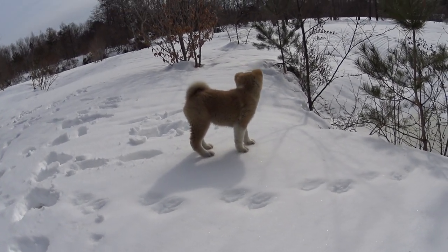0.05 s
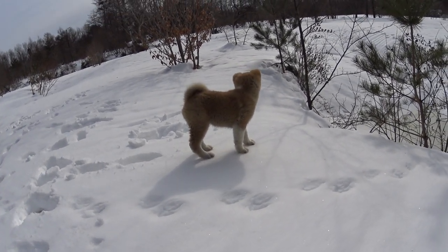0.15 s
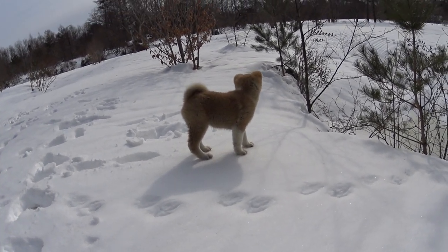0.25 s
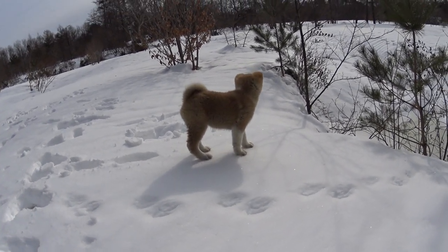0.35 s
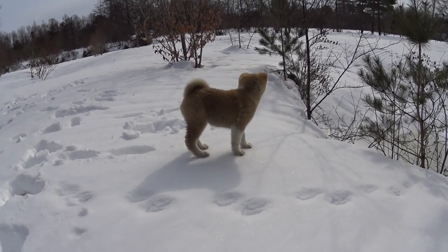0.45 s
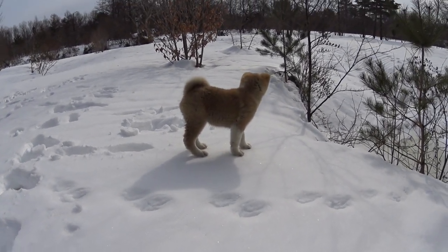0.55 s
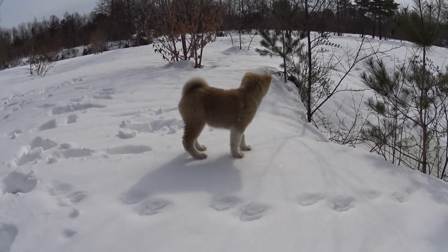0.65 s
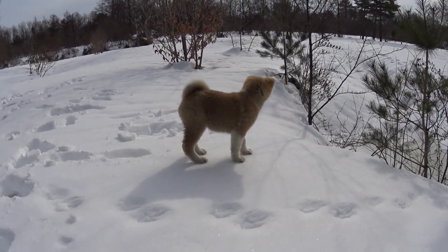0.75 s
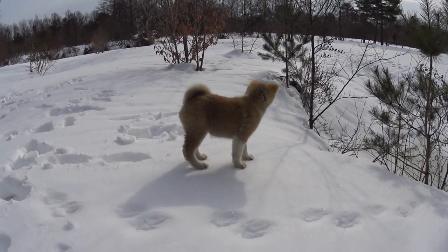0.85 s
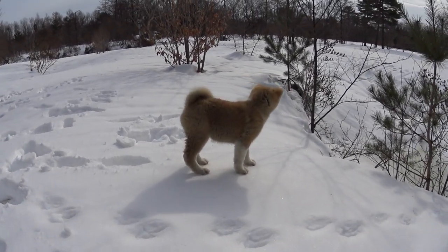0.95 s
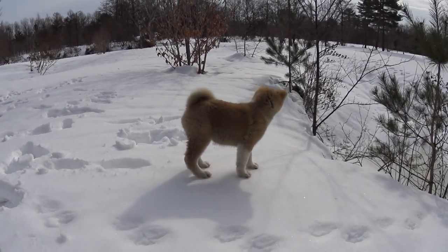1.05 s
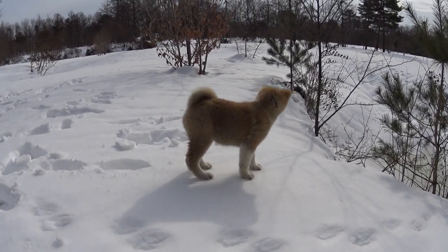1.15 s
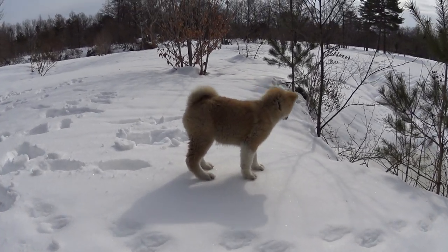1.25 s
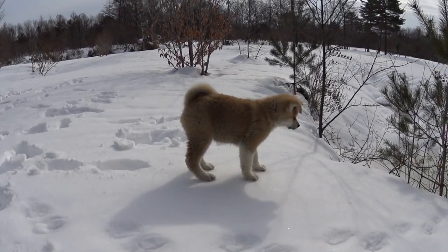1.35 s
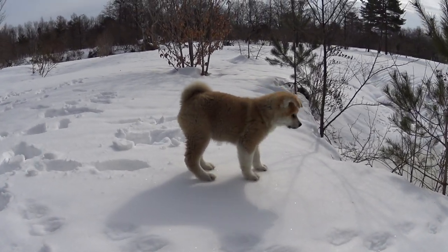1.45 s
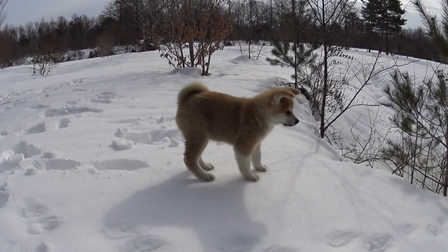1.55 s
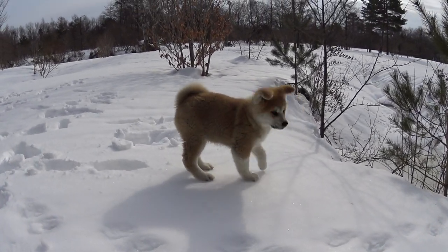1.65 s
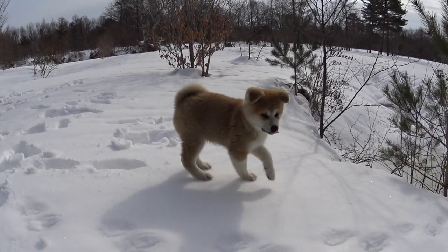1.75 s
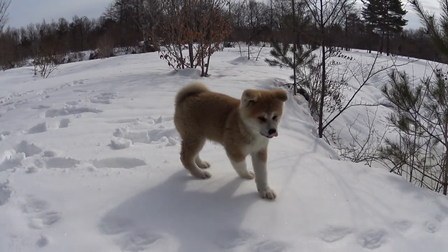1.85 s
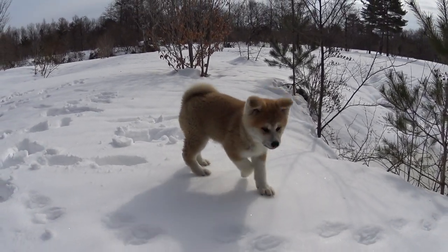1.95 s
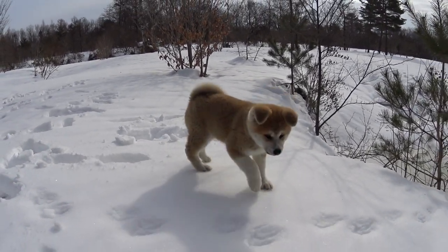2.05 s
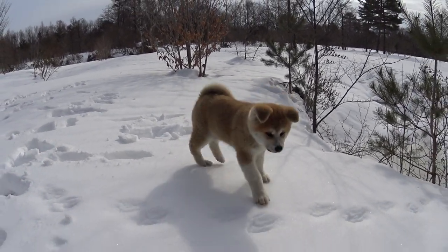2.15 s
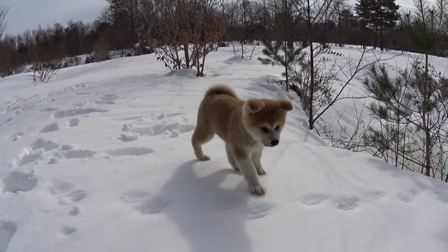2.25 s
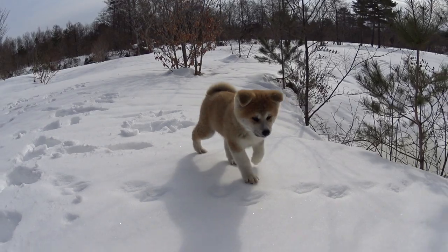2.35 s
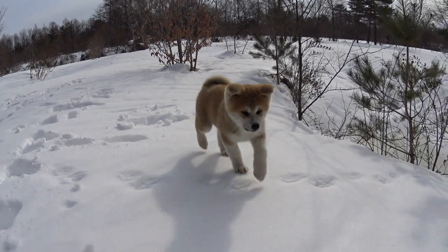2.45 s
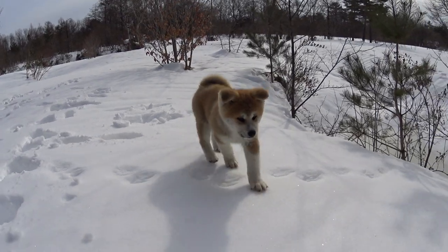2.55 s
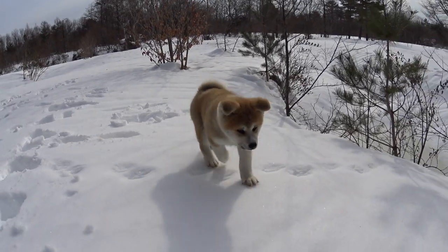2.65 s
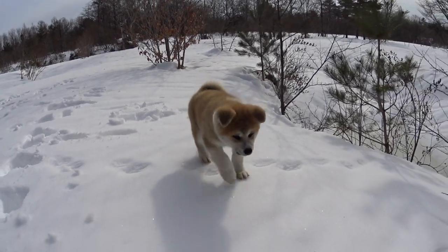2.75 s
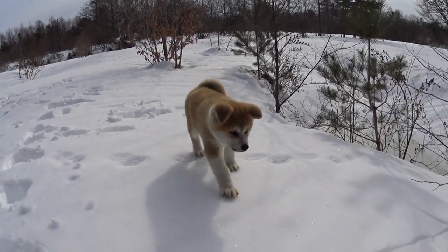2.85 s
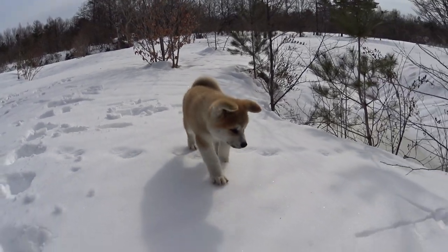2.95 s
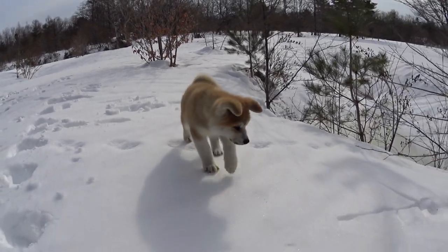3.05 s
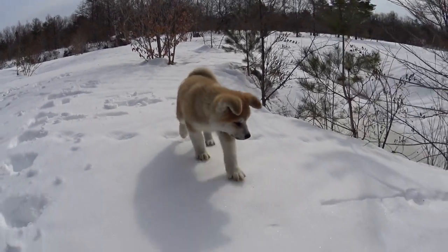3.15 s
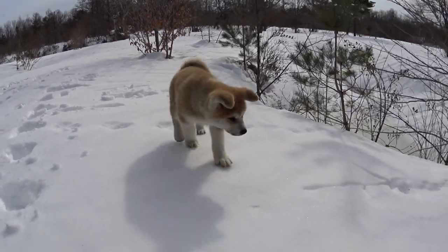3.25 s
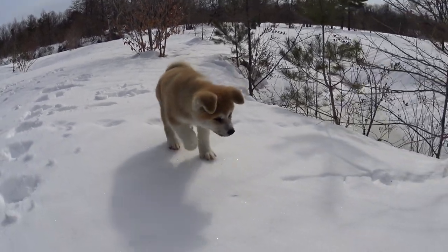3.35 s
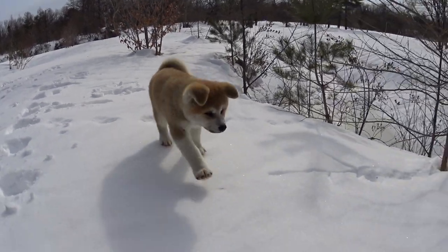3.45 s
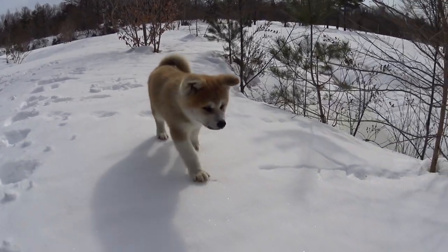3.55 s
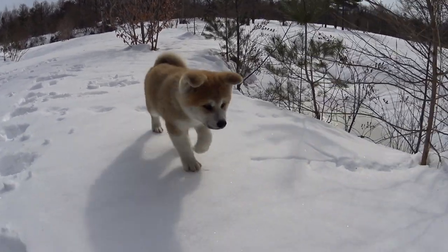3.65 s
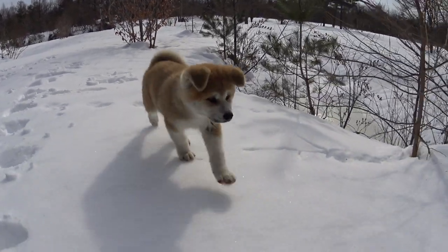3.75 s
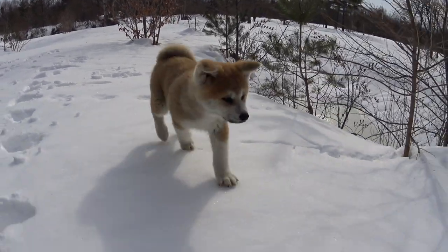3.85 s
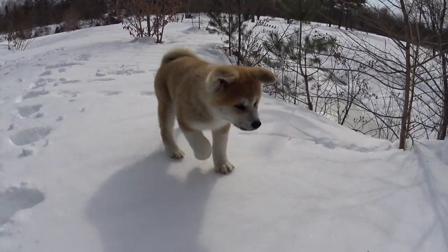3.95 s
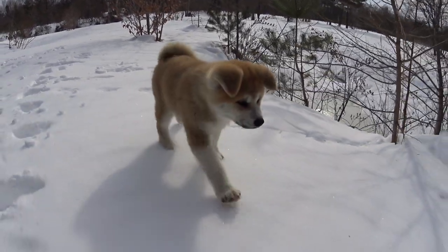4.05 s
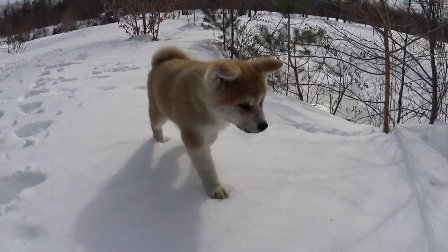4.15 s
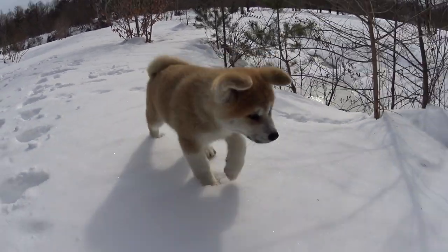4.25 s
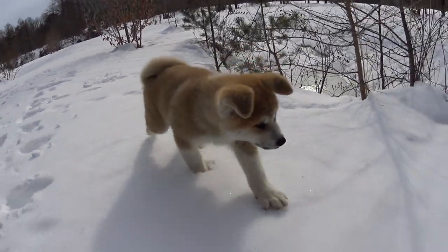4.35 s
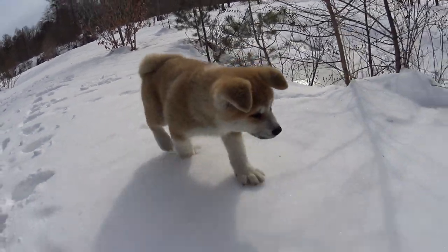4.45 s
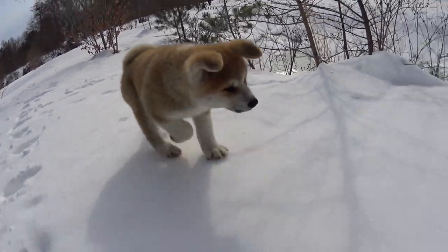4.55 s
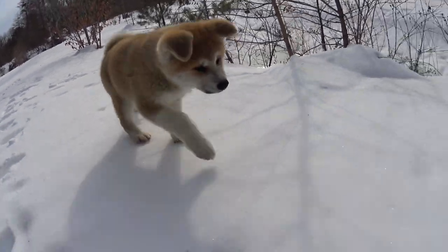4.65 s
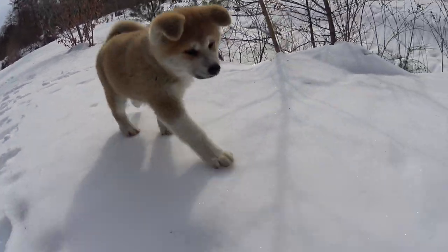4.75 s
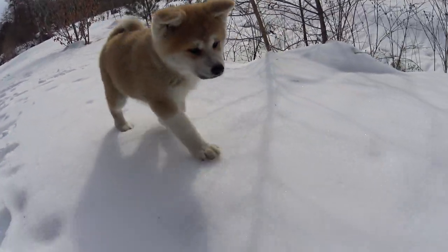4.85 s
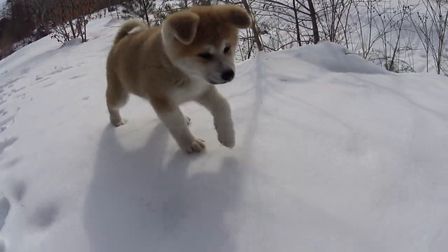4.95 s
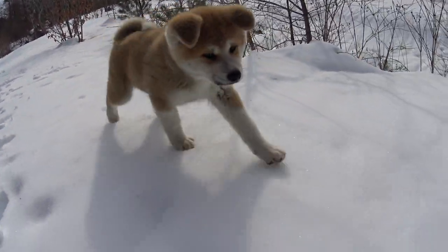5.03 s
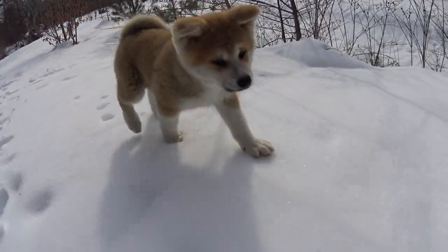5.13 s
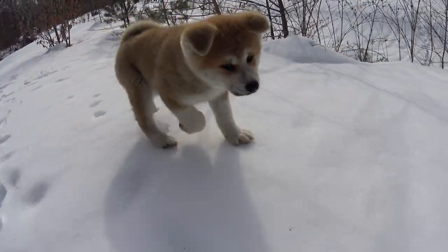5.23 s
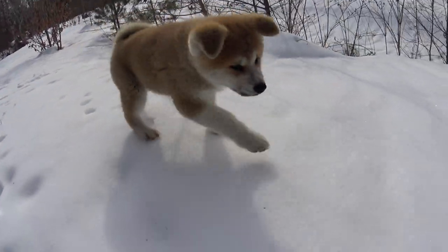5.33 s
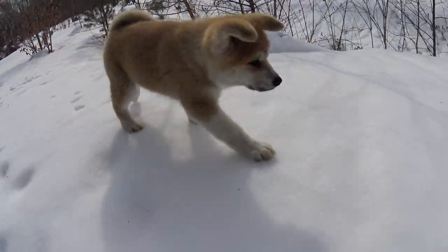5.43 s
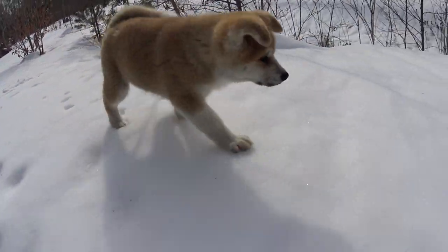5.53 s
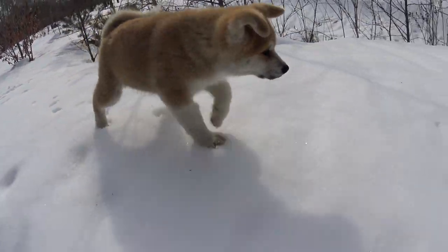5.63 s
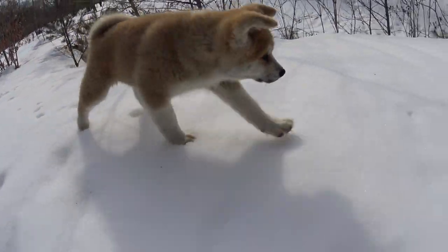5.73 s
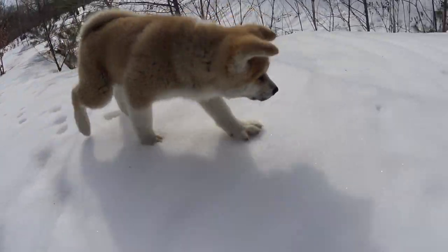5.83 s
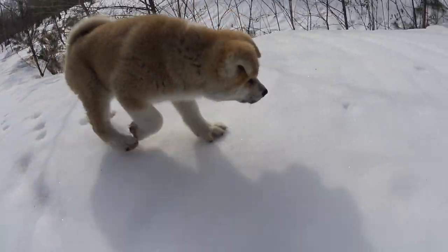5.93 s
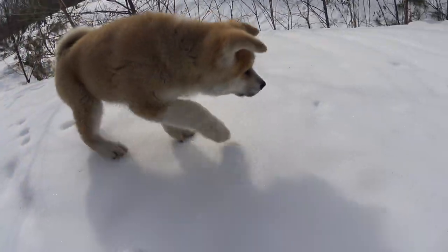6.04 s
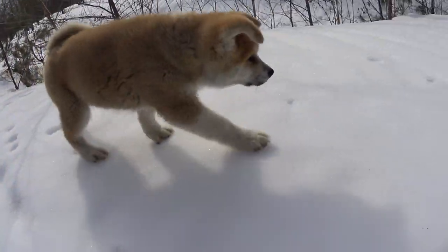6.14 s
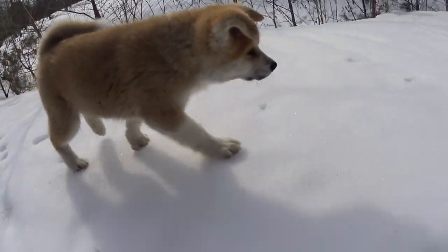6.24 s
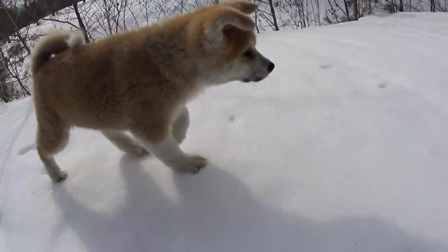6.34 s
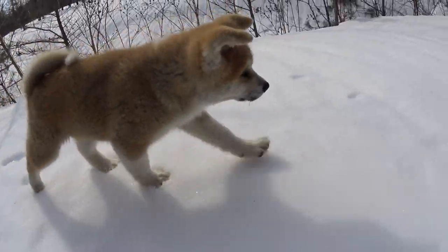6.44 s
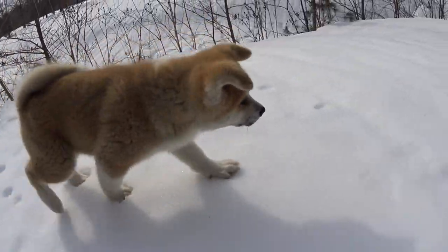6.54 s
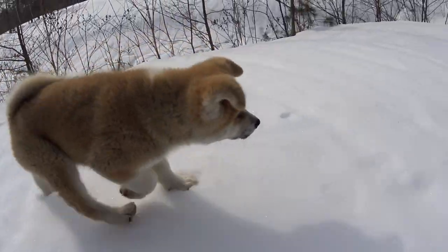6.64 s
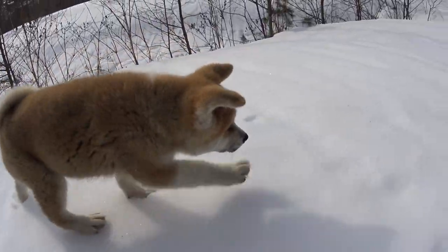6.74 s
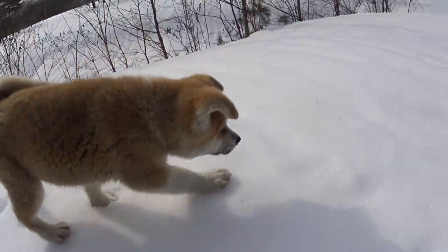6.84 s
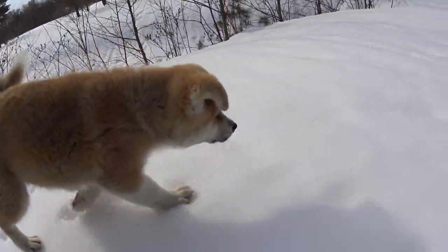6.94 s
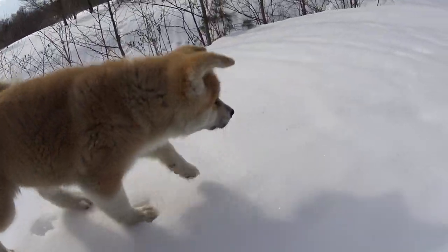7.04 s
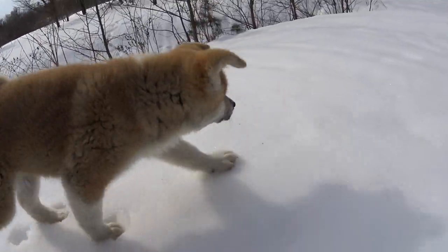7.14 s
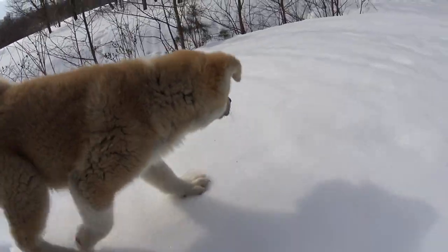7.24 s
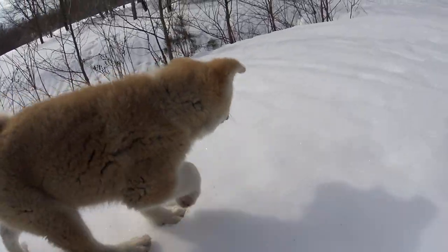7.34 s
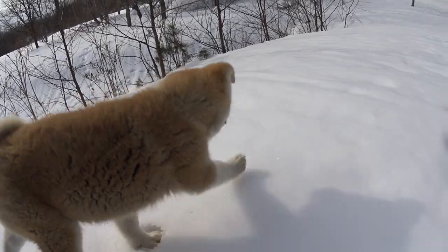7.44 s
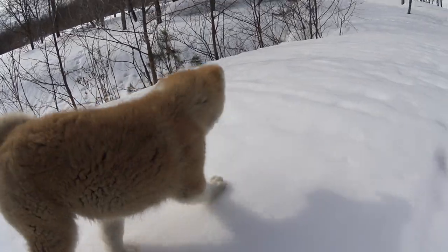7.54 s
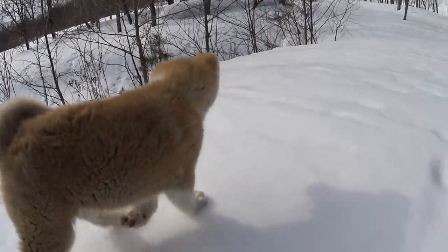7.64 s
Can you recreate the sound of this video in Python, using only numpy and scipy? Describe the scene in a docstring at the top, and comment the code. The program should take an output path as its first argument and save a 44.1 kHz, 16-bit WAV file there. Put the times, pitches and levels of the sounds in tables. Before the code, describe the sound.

In quiet open air with a very faint, wide hush, a rapid cluster of light hollow knocks and ticks comes from the camera's case between 0.05 and 0.4 seconds. A soft rustle swells around 0.8 and fades by 1.5. From about 1.6 a puppy's paws start treading on crusted snow, the first steps faint, then firmer crunches near 1.9, 2.7 and 2.9. Steps continue irregularly, roughly two to four per second, each a gritty, jerky packing with a dull groan, short low thumps of falling pitch and icy crackles. Fuller crunches come around 3.6-3.9 and 4.6; from 5 to 5.8 the steps are lighter, with crisp high crystal snaps. Brighter hiss builds at 6.0-6.6, then the heaviest, closest crunch lands near 6.85, followed by dense crackling to 7.3 and a small final crunch about 7.6. The sound is dry, close, without echo.

```python
"""Footsteps on crusted snow

Feet tread through crusted snow just below a hand-held camera, in the open under a faint hush of air.
Each tread packs the snow: stick-slip jerks gate random grains into a crunch, a groan and a hiss.
Pockets cave in as short pushes of falling pitch, and the icy crust breaks in coloured bursts of grains.
Before the walk a soft rustle passes, and light knocks ring the decaying modes of the camera's case."""
import sys
import numpy as np
from scipy import signal
from scipy.fft import rfft, irfft
from scipy.io import wavfile

SR = 44100
rng = np.random.default_rng(int(sys.argv[2]) if len(sys.argv) > 2 else 0)


def wav_out(sig):
    """Save sig, one row per channel (or a flat mono array), as 16-bit PCM at SR to the path in sys.argv[1]."""
    wavfile.write(sys.argv[1], SR, np.round(np.clip(np.atleast_2d(sig).T, -1, 1) * 32767).astype(np.int16))


N = 339062
TIME = np.arange(N) / SR

# All event levels are relative: the sources have trims of their own.
# spectrum of the outdoor hush: [frequency_hz, density_db_per_hz], and its overall level
AIR_COLOUR = [(12, -16), (20, -12.5), (459, -4), (499, -4), (642, -3.5), (780, -9), (923, -7.5),
              (1530, -9.5), (2320, -15), (16000, -31.5)]
AIR_DB = -60
# spectrum of the soft rustle: [frequency_hz, density_db_per_hz]
RUSTLE_COLOUR = [(300, 0.5), (1200, 5), (3000, -2.5), (5500, -8.5), (8000, -22), (16000, -13)]
# swell and fade of the rustle: [time_s, level_db]
RUSTLE_SWELL = [(0, -76), (.45, -73), (.8, -61), (1.1, -66.5), (1.5, -87)]
# likeness of the air in the two channels: [frequency_hz, correlation (-1 to 1)]
AIR_LIKENESS = [(60, 0.86), (400, -0.42), (3000, 0.19), (15000, 0.93)]

# knocks on the camera's case: [start_s, boom_db, tick_db]
CASE_KNOCKS = [(.053, -55.5, -70), (0.143, -62, -49), (0.181, -51.5, -51.5), (.231, -46.5, -47.5),
               (0.272, -55, -58), (0.379, -57, -68)]
# resonant modes of the case: [pitch_hz, level_db, t60_s]
CASE_MODES = [(174.4, 3.5, 0.13), (596, -1.5, 0.15), (1085, -21, 0.13), (2000, -16, 0.11),
              (2830, -14, 0.069), (4560, -19, 0.2), (5670, -19, 0.11), (6750, -22, 0.14)]
# spectrum of the knock's hard contact: [frequency_hz, density_db_per_hz]
TICK_COLOUR = [(100, 1), (800, 9), (3000, -1), (7000, -8), (9000, -20), (16000, -23)]

# pockets of snow giving way under a foot: [start_s, level_db, pitch_hz, jolts (count)]
SNOW_COLLAPSES = [(1.586, -46, 230, 1), (1.901, -46, 228, 1), (1.975, -27, 390, 1), (2.901, -22.5, 433, 2),
                  (3.499, -29.5, 414, 1), (3.652, -19, 367, 1), (3.755, -22, 196, 1), (3.794, -32, 310, 1),
                  (3.877, -22.5, 490, 2), (4.195, -29, 298, 1), (4.272, -27, 750, 1),
                  (4.402, -33.5, 208, 1), (4.493, -34.5, 194, 1), (4.583, -24, 218, 5),
                  (4.904, -23.5, 444, 2), (5.012, -24, 524.7, 1), (6.015, -29, 244, 1),
                  (6.211, -25.5, 610, 1), (6.398, -21.5, 207, 1), (6.726, -27.5, 456, 1),
                  (6.738, -23.5, 415, 1), (6.867, -17.5, 250, 1), (7.023, -22.5, 187, 2),
                  (7.082, -21, 292, 1)]
# each further jolt comes a little weaker and lower
JOLT_GAP_S, JOLT_STEP_DB, JOLT_PITCH_RATIO = 0.026, -2.5, 0.79

# a foot loads the snow: [start_s, rise_s, hold_s, crunch_db, groan_db, hiss_db]
FOOT_TREADS = [(1.673, 0.038, 0.089, -61.5, -64, -71.5), (1.914, 0.045, 0.014, -49.5, -44.5, -65),
               (2.052, .08, 0.15, -55, -50, -72.5), (2.31, 0.021, 0.44, -101, -73, -70),
               (2.684, 0.013, .1, -49, -48, -67), (2.895, .012, 0.23, -46, -46, -62.5),
               (3.24, 0.053, 0.36, -55, -52.5, -61), (3.64, 0.017, 0.13, -43.5, -42.5, -61.5),
               (3.829, 0.033, 0.16, -46.5, -42.5, -54.5), (4.071, .006, 0.044, -51, -42.5, -51),
               (4.556, .015, 0.038, -44.5, -37, -52.5), (4.723, 0.11, 0.11, -44, -44.5, -62),
               (5.037, 0.012, 0.2, -45.5, -46, -67), (5.254, .04, 0.22, -52, -50.5, -59.5),
               (5.505, 0.02, 0.23, -53, -46, -55.5), (5.76, .03, 0.2, -69, -57.5, -63.5),
               (5.994, 0.014, 0.12, -48.5, -51, -58), (6.136, 0.051, 0.083, -44.5, -52, -53),
               (6.245, 0.038, 0.11, -48, -45.5, -46.5), (6.539, .02, 0.092, -56, -50, -52.5),
               (6.846, 0.018, 0.032, -38.5, -35, -44.5), (6.984, 0.028, 0.17, -45, -42.5, -58),
               (7.307, 0.0066, 0.18, -55, -53.5, -58.5), (7.566, 0.027, 0.015, -52.5, -70, -58.5)]
RELEASE_DB_PER_S = 153  # the fast fall once the weight is on
# trodden snow goes on settling, relative to the tread: [crunch_db, groan_db, hiss_db]
SETTLING_DB = (-7, -12, -10)
SETTLING_DB_PER_S = 24.5
# firming of the snow, change from landing to full weight: [crunch_db, groan_db, hiss_db]
FIRMING_CHANGE_DB = (1.5, -2, 4)
# spectra of packing snow: [frequency_hz, density_db_per_hz]
CRUNCH_COLOUR = [(60, -19.5), (250, 2), (500, 2), (950, 0), (1500, -5.5), (2500, -11.5), (4000, -16),
                 (6500, -30.5), (11000, -33.5), (16000, -42)]
GROAN_COLOUR = [(15, -19), (35, -14.5), (70, -9), (125, -3), (190, 2), (300, -5), (500, -21.5),
                (1000, -19.5), (3000, -71)]
CRYSTAL_COLOUR = [(300, -17.5), (2000, 6), (4500, 3.5), (7500, -0.5), (10000, -4), (12000, -3.5),
                  (16000, -12)]

# the crust cracks into a spray of crystals: [start_s, level_db, length_s, focus_hz]
CRUST_CRACKS = [(1.971, -53, 0.033, 4500), (2.292, -46.5, 0.054, 2320), (2.462, -53, 0.018, 3930),
                (2.688, -47, 0.095, 4700), (2.752, -47.5, 0.13, 4000), (3.06, -45, 0.11, 1300),
                (3.132, -49, 0.084, 4760), (3.196, -49, 0.0089, 7500), (3.215, -48, 0.059, 4000),
                (3.466, -47.5, 0.1, 2150), (3.62, -41.5, .009, 4520), (3.645, -40, 0.068, 4100),
                (3.868, -45.5, 0.18, 1500), (4.05, -41, 0.012, 8500), (4.073, -39, 0.05, 7800),
                (4.186, -43.5, 0.11, 7300), (4.266, -44.5, 0.067, 4140), (4.318, -43, 0.14, 8160),
                (4.491, -42, 0.072, 8300), (4.558, -38, 0.087, 3670), (4.691, -42, 0.029, 7500),
                (4.778, -44, 0.096, 7300), (5.011, -47, 0.078, 7500), (5.069, -41.5, 0.076, 6600),
                (5.138, -44, 0.087, 6200), (5.235, -42, 0.027, 6900), (5.35, -42, 0.016, 6800),
                (5.402, -44.5, 0.11, 7340), (5.53, -41, 0.012, 7450), (5.546, -36, 0.036, 7740),
                (5.634, -39.5, 0.049, 8500), (5.68, -42, 0.071, 7260), (5.858, -47, 0.017, 6760),
                (6.1, -44, 0.48, 860), (6.159, -40.5, 0.0077, 7360), (6.206, -36, 0.014, 7800),
                (6.3, -43, 0.097, 3920), (6.438, -42.5, 0.1, 7350), (6.56, -37.5, 0.089, 6700),
                (6.834, -48, .005, 4000), (6.854, -33.5, 0.098, 3480), (6.87, -40.5, 0.15, 8750),
                (6.94, -45.5, 0.13, 4030), (7.041, -36.5, 0.085, 2430), (7.115, -42.5, 0.054, 7900),
                (7.216, -36.5, 0.025, 5550), (7.257, -39, 0.079, 6000), (7.577, -40, 0.0054, 4700),
                (7.614, -44, 0.073, 3560)]
# spectrum of breaking crust, before the focus of each crack: [frequency_hz, density_db_per_hz]
CRUST_COLOUR = [(40, 5.5), (180, 24), (450, 14.5), (1200, 16), (2500, 7.5), (4500, 2), (7500, 0),
                (10000, -2), (12000, 1), (16000, -8)]
# small flakes snap at random; their level is relative to the moving crystals
FLAKE_MEDIAN_GAP_S, FLAKE_DB, FLAKE_SPREAD_DB = 1 / 12, 5, 0.5
FLAKE_MEDIAN_LENGTH_S, FLAKE_MEDIAN_HZ = 0.018, 7160

# phase of left relative to right: [frequency_hz, phase_rad]
LEFT_PHASE = [(60, -.25), (180, -.33), (350, -.57), (750, -.83), (1400, -.77), (2800, -.48), (5500, -.16),
              (16000, -.05)]
# level of left relative to right: [frequency_hz, difference_db]
LEFT_OVER_RIGHT = [(120, 0), (700, 0.86), (1500, 1.5), (4400, 1), (15000, 0)]
BAND_EDGE_HZ = 15950


def gain_of(db):
    """Level law: decibels to amplitude."""
    return 10 ** (np.asarray(db) / 20)


def evened(x):
    """Power normalisation: scales a signal to rms 1."""
    return x / np.sqrt(np.mean(x ** 2) + 1e-20)


def read(points, hz):
    """Log-frequency interpolation of a tabulated spectrum."""
    f, value = np.transpose(points)
    return np.interp(np.log(hz + 1), np.log(f + 1), value)


def add(mix, s, sound):
    """Superposition: adds a sound to the mix in place at time s."""
    part = mix[max(round(s * SR), 0):][:len(sound)]
    part += sound[:len(part)]


def coloured(x, spectrum, size=4096):
    """Minimum-phase filtering: a causal response of unit energy keeps the fronts of clicks sharp."""
    hz = abs(np.fft.fftfreq(size, 1 / SR))
    log_gain = np.log(gain_of(read(spectrum, hz)))
    # the Hilbert transform of the log gain supplies the minimum phase
    response = np.exp(np.conj(signal.hilbert(log_gain)))
    taps = np.fft.ifft(response).real[:size // 2]
    return signal.oaconvolve(x, taps / np.linalg.norm(taps))[:len(x)]


def burst(length_s, rise_s, hold=1.48):
    """Impulsive envelope: rises fast, holds a moment and is about 20 dB down after its length."""
    t = np.arange(SR // 3) / SR
    shape = (1 - np.exp(-t / rise_s)) * 10 ** -((t / length_s) ** hold)
    return shape / shape.max()


def wander(rate_hz):
    """Band-limited random motion: slow smooth noise of rms 1."""
    hz = np.fft.rfftfreq(N, 1 / SR)
    slow_cut = hz / (hz + rate_hz / 10)
    fast_cut = 1 / (1 + (hz / rate_hz) ** 2)
    return evened(irfft(rfft(rng.standard_normal(N)) * slow_cut * fast_cut, N))


def grains(per_s, spread_db, wash):
    """Shot noise of snapping ice bonds: sparse clicks over a wash of countless tiny ones."""
    size = gain_of(spread_db * np.minimum(rng.exponential(1, N), 3))
    sign = rng.choice([-1, 1], N)
    snaps = rng.random(N) < per_s / SR
    clicks = size * sign * snaps
    return evened(evened(clicks) + wash * rng.standard_normal(N))


def slips(per_s, fade_s, steady):
    """Stick-slip friction: jerks of uneven size and timing die quickly over a steady part, rms 1."""
    gaps = rng.gamma(2, SR / per_s / 2, 4000)
    at = np.cumsum(gaps).astype(int)
    inside = at < N
    jerks = np.zeros(N)
    jerks[at[inside]] = rng.uniform(0.3, 1, len(at))[inside] ** 2
    power = signal.lfilter([1], [1, -np.exp(-2 / (fade_s * SR))], jerks)
    return evened(np.sqrt(power / power.mean() + steady))


def air():
    """Partially correlated noise: a faint wide outdoor hush with a passing rustle."""
    hz = np.fft.rfftfreq(N, 1 / SR)
    swell = gain_of(np.interp(TIME, *np.transpose(RUSTLE_SWELL)))
    spectra = []
    for _ in range(2):
        hush = gain_of(AIR_DB) * coloured(rng.standard_normal(N), AIR_COLOUR)
        rustle = swell * coloured(rng.standard_normal(N), RUSTLE_COLOUR)
        spectra.append(rfft(hush + rustle))
    left, other = spectra
    same = np.clip(read(AIR_LIKENESS, hz), -1, 1)
    right = same * left + np.sqrt(1 - same ** 2) * other
    return irfft(np.array([left, right]), N)


def knocks(stiff_hz=1500, vary_db=3):
    """Modal excitation: a blow booms in the low case modes; its tick rings the high ones unevenly."""
    out, t = np.zeros(N), np.arange(SR // 3) / SR
    for s, boom_db, tick_db in CASE_KNOCKS:
        spots = rng.uniform(-0.84, 1, len(CASE_MODES))  # varies high-mode level and all pitches
        for (hz, db, t60), spot in zip(CASE_MODES, spots):
            blow_db = boom_db if hz < stiff_hz else tick_db + vary_db * spot
            decay = np.exp(-np.log(1000) * t / t60)
            ring = decay * np.sin(2 * np.pi * hz * (1 + 0.01 * spot) * t)
            add(out, s, gain_of(blow_db + db) * ring)
        tick = burst(length_s=0.0074, rise_s=0.00052) * rng.standard_normal(len(t))
        add(out, s, gain_of(tick_db) * coloured(tick, TICK_COLOUR))
    return out


def collapses(cycles=0.68, fall=0.41, grit_db=-18, grit_db_per_octave=3, push_db=-2.5):
    """Sudden yielding: a pocket caves in by brief pushes of falling pitch, the higher with more grit."""
    out, grit = np.zeros(N), np.zeros(N)
    t = np.arange(-SR // 50, SR // 50) / SR
    for start, first_db, first_hz, jolts in SNOW_COLLAPSES:
        for k in range(round(jolts)):
            s = start + k * JOLT_GAP_S
            db = first_db + k * JOLT_STEP_DB
            hz = first_hz * JOLT_PITCH_RATIO ** k
            u = t * hz / cycles
            # the pitch passes through hz at the middle of the push; the starting phase is random
            swept = cycles * (u - fall * np.logaddexp(u, -u)) + rng.random()
            push = np.sin(2 * np.pi * swept) / np.cosh(2 * u)
            add(out, s + t[0], gain_of(db + push_db) * push)
            puff_db = db + grit_db + grit_db_per_octave * np.log2(hz / 400)
            add(grit, s - 0.002, gain_of(puff_db) * burst(length_s=0.02, rise_s=0.0013))
    gritty = grit * grains(per_s=2700, spread_db=2.0, wash=1.0)
    return out + coloured(gritty, CRUNCH_COLOUR)


def loads():
    """Loading and relaxation: crunch, groan and hiss levels rise, hold, let go and settle per tread."""
    power = np.zeros((3, N))
    for s, rise_s, hold_s, *levels_db in FOOT_TREADS:
        first = round(s * SR)
        t = TIME[:N - first]
        after = np.maximum(t - rise_s - hold_s, 0)
        release = -RELEASE_DB_PER_S * after
        settling = np.subtract.outer(SETTLING_DB, SETTLING_DB_PER_S * after)
        # a tread starts dull and brightens as the snow firms
        weight = np.minimum(t / (rise_s + hold_s), 1)
        change_db = np.maximum(release, settling) + np.outer(FIRMING_CHANGE_DB, weight - 0.5)
        level = gain_of(np.array(levels_db)[:, None] + change_db)
        power[:, first:] += (np.minimum(t / rise_s, 1) * level) ** 2
    return np.sqrt(power)


def packing(crunch, groan, hiss):
    """Stick-slip compaction: snow packs in jerks of gritty crunch, dull groan and ticking crystals."""
    jerks = slips(per_s=85, fade_s=0.01, steady=0.89)
    crunch = crunch * jerks * grains(per_s=2500, spread_db=3.0, wash=0.54)
    flutter = evened(gain_of(2.24 * wander(38)))
    groan = groan * jerks * flutter * grains(per_s=600, spread_db=-1.0, wash=0.41)
    ticking = slips(per_s=45, fade_s=0.0029, steady=1.0)
    hiss = hiss * ticking * grains(per_s=4000, spread_db=0.5, wash=0.99)
    out = gain_of(2.4) * coloured(crunch, CRUNCH_COLOUR)
    out += gain_of(-1.23) * coloured(groan, GROAN_COLOUR)
    return out + gain_of(4.5) * coloured(hiss, CRYSTAL_COLOUR)


def small_cracks(hiss):
    """Random fracture: flakes snap by chance, their level following the moving crystals."""
    gap, size, span, pitch = rng.standard_normal((200, 4)).T
    s = np.cumsum(np.exp(0.6 * gap)) * FLAKE_MEDIAN_GAP_S
    db = 20 * np.log10(np.interp(s, TIME, hiss) + 1e-9) + FLAKE_DB + FLAKE_SPREAD_DB * size
    length_s = FLAKE_MEDIAN_LENGTH_S * 2 ** (0.5 * span)
    focus_hz = FLAKE_MEDIAN_HZ * 2 ** (0.3 * pitch)
    return np.transpose([s, db, length_s, focus_hz])[s < TIME[-1]]  # columns as in CRUST_CRACKS


def crust(hiss, focus_db=14, octaves=1.0):
    """Brittle fracture: icy skin breaks in clumped grains; thick slabs crunch low, thin flakes hiss high."""
    clumps = evened(gain_of(1.6 * wander(300)))
    spray = clumps * grains(per_s=5000, spread_db=4.5, wash=0.86)
    out, hz = np.zeros(N), np.geomspace(40, 16000, 50)
    for s, db, length_s, focus_hz in [*CRUST_CRACKS, *small_cracks(hiss)]:
        shape = burst(length_s, rise_s=0.0014 + 0.036 * length_s)  # a wide break takes longer to spread
        focus = np.exp(-(np.log2(hz / focus_hz) / octaves) ** 2)
        colour = read(CRUST_COLOUR, hz) + focus_db * focus
        flakes = spray.take(round(s * SR) + np.arange(len(shape)), mode="wrap")
        crack = coloured(shape * flakes, np.transpose([hz, colour]))
        add(out, s - 0.001, gain_of(db) * crack)
    return gain_of(-0.64) * out


def widened(x, scatter_db=-19, scatter_t60=0.034):
    """Stereo widening: sides differ in phase, most near 750 Hz, and slightly in level, with diffuse scatter."""
    hz = np.fft.rfftfreq(N, 1 / SR)
    # half of the difference goes to each side
    half = gain_of(read(LEFT_OVER_RIGHT, hz) / 2) * np.exp(1j * read(LEFT_PHASE, hz) / 2)
    direct = irfft(rfft(x) * np.array([half, 1 / half]), N)
    t = np.arange(SR // 10) / SR
    taps = rng.standard_normal((2, len(t))) * np.exp(-np.log(1000) * t / scatter_t60)
    scatter = signal.oaconvolve(x[None], taps / np.linalg.norm(taps[0]), axes=1)[:, :N]
    return direct + gain_of(scatter_db) * scatter


def scene():
    """Free-field sound: open snow gives no echo, so the close sounds get only a little short scatter."""
    crunch, groan, hiss = loads()
    close = packing(crunch, groan, hiss) + collapses() + crust(hiss) + knocks()
    return widened(close) + air()


def record(dry):
    """Band limiting: the recorder's linear-phase low-pass filter."""
    taps = signal.firwin(511, BAND_EDGE_HZ, window=("kaiser", 9), fs=SR)
    return signal.oaconvolve(dry, taps[None], "same")


dry = scene()
out = record(dry)
wav_out(out)
```